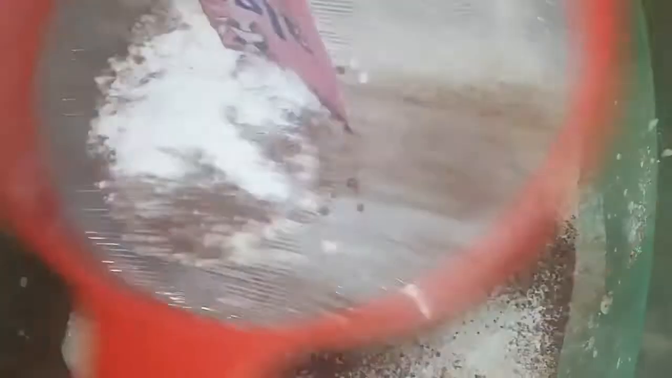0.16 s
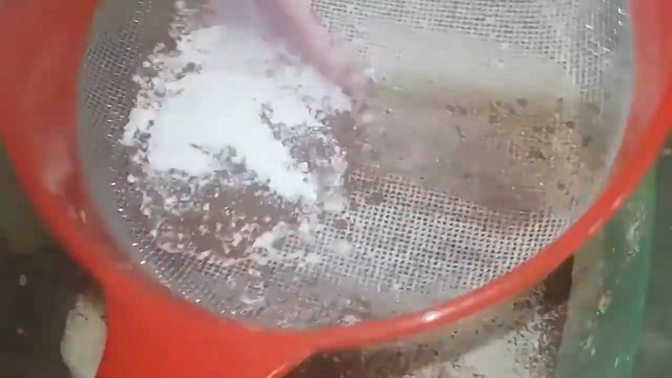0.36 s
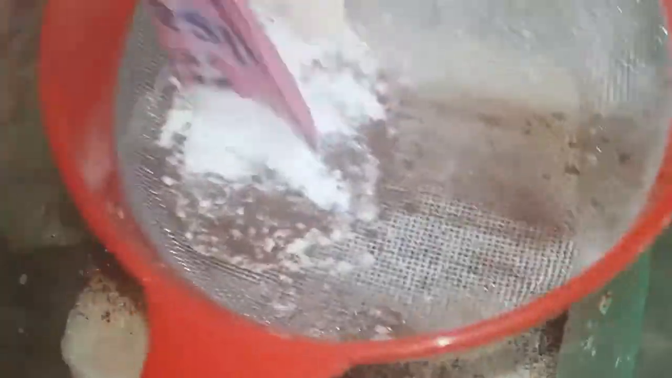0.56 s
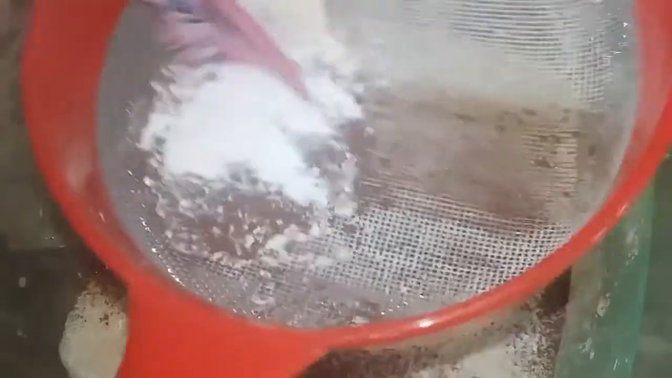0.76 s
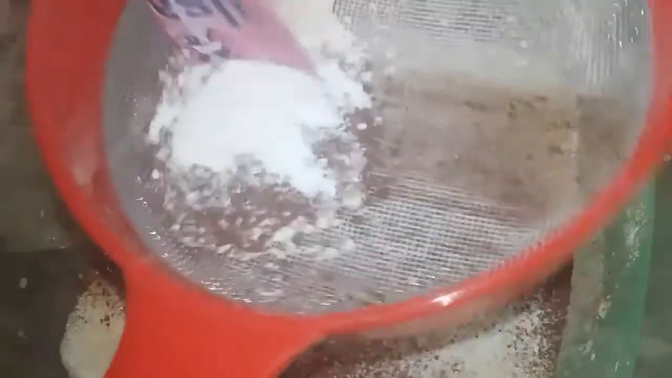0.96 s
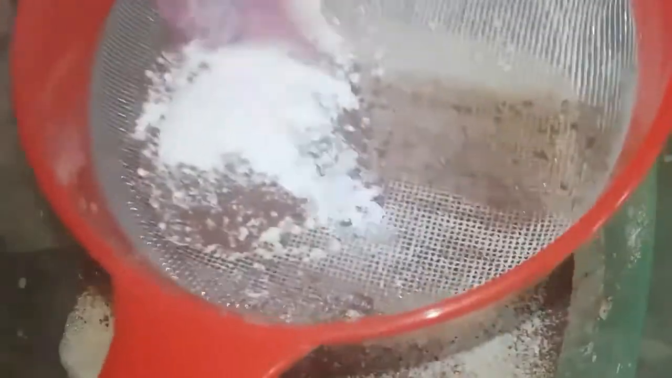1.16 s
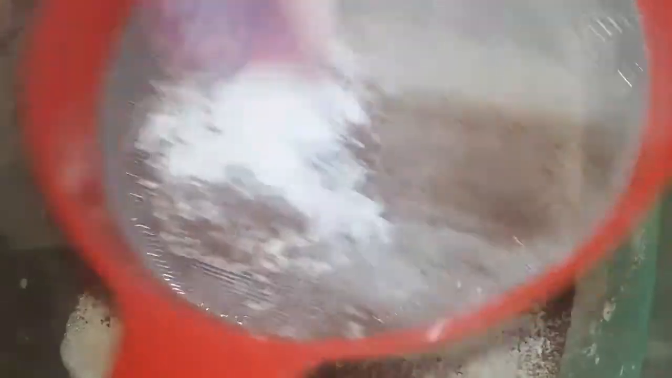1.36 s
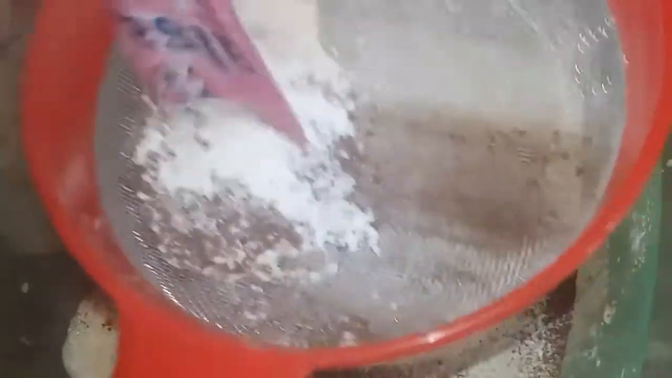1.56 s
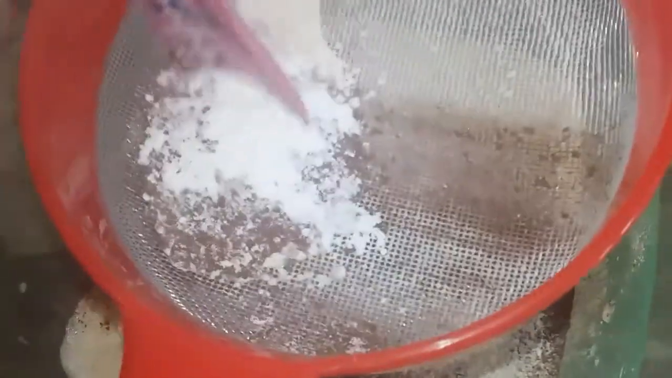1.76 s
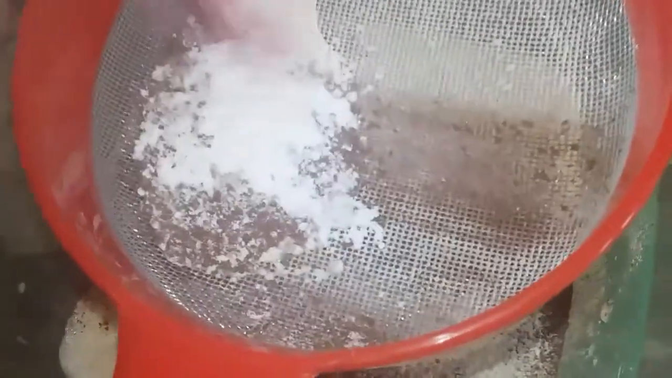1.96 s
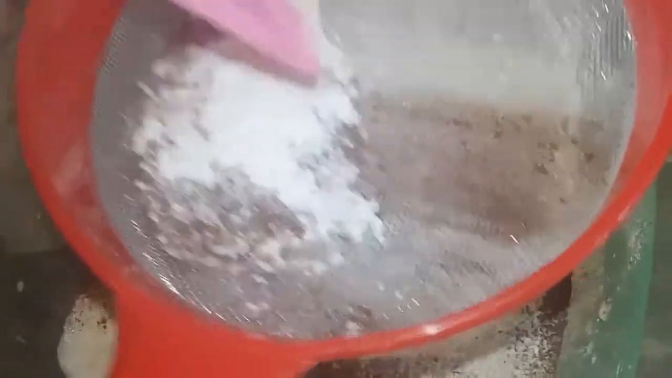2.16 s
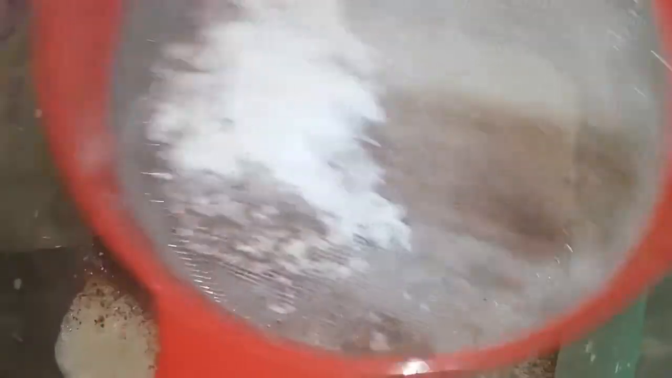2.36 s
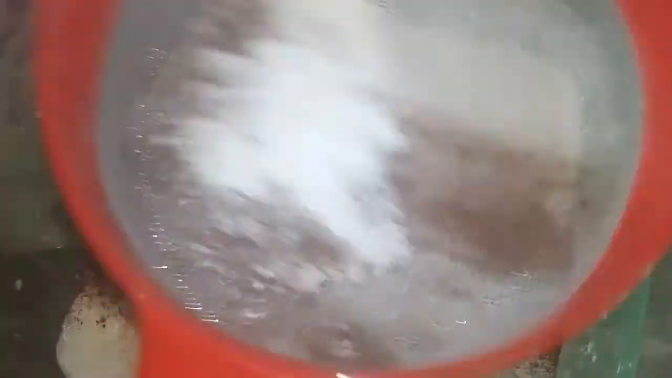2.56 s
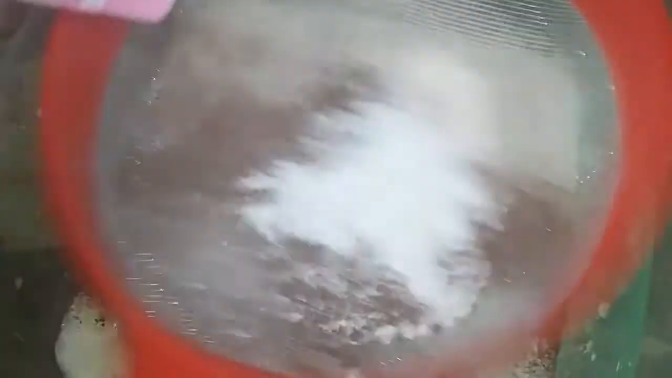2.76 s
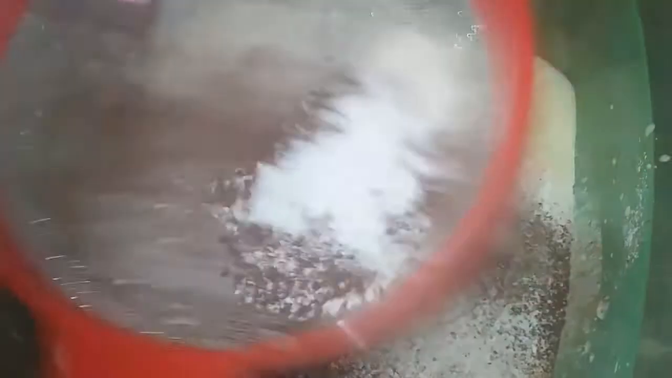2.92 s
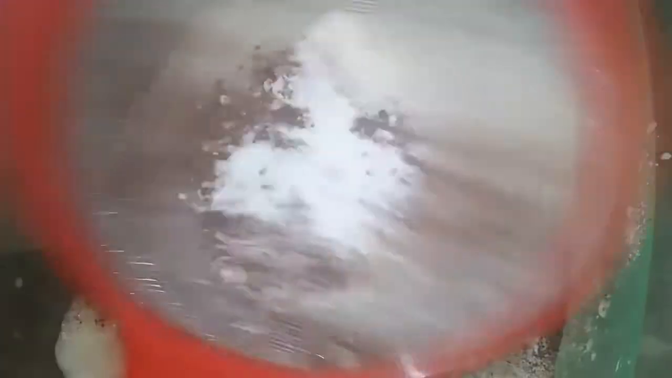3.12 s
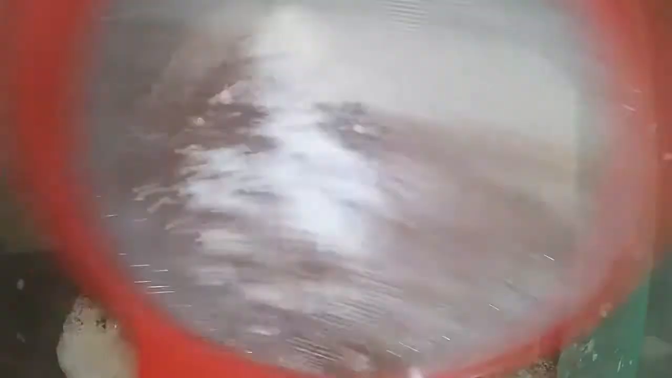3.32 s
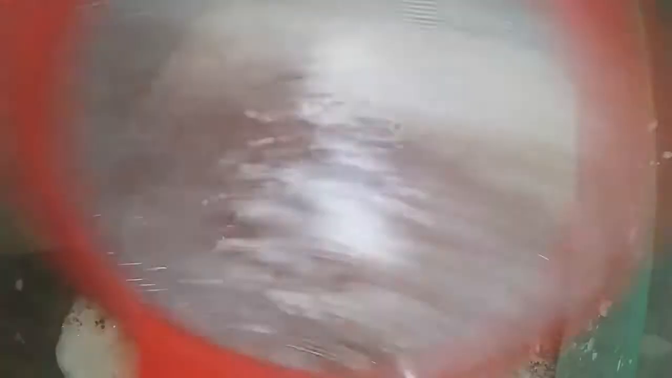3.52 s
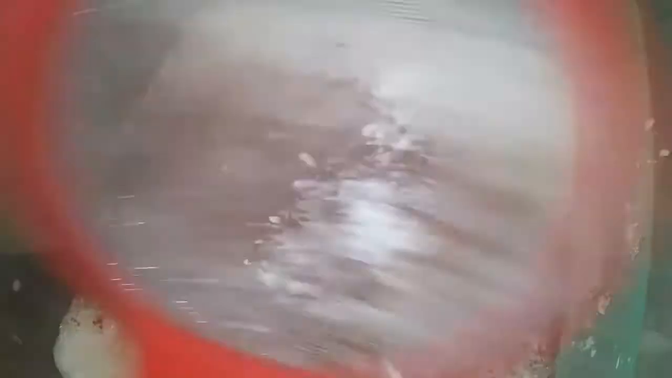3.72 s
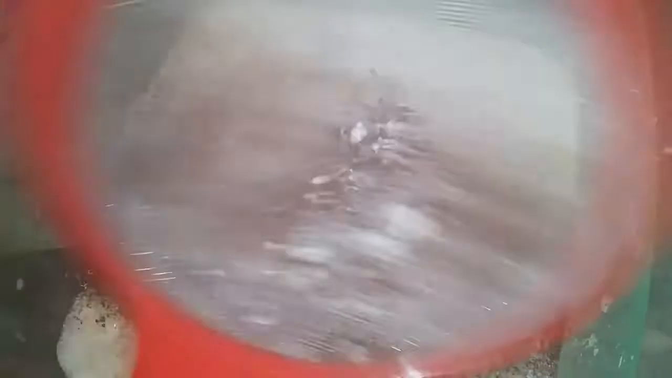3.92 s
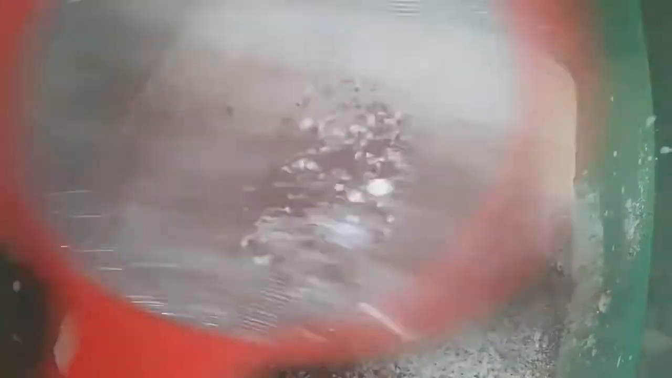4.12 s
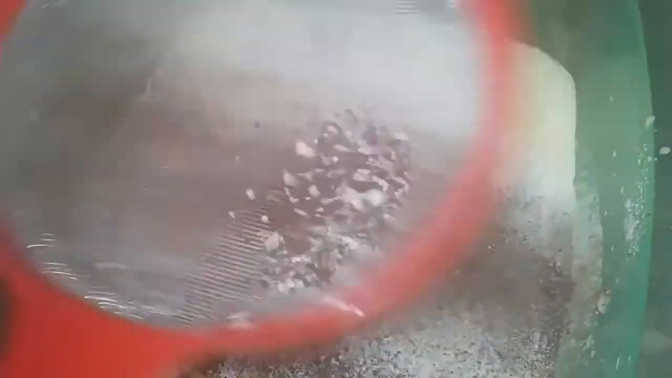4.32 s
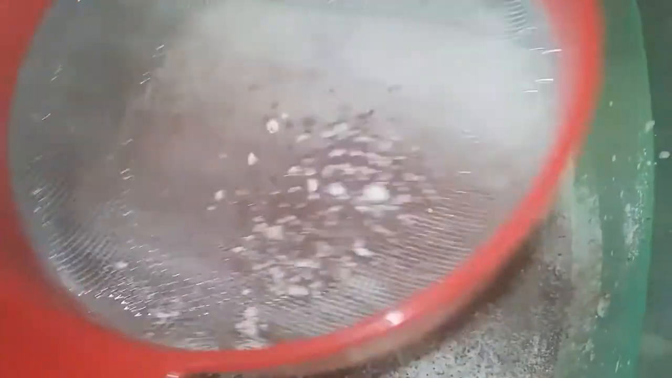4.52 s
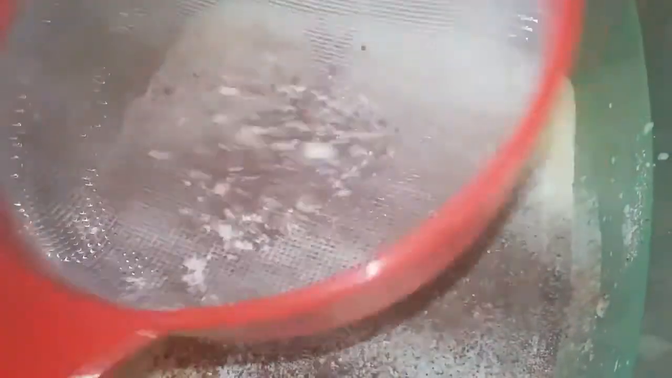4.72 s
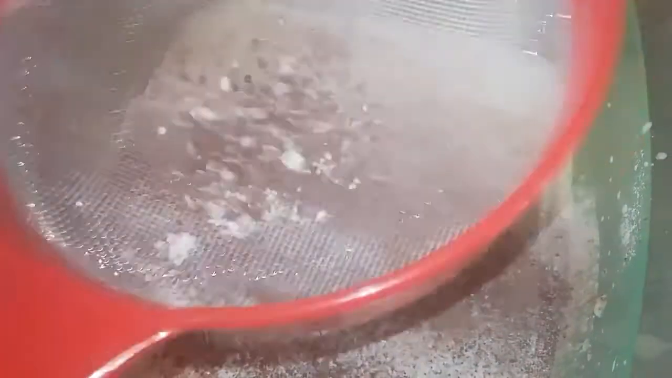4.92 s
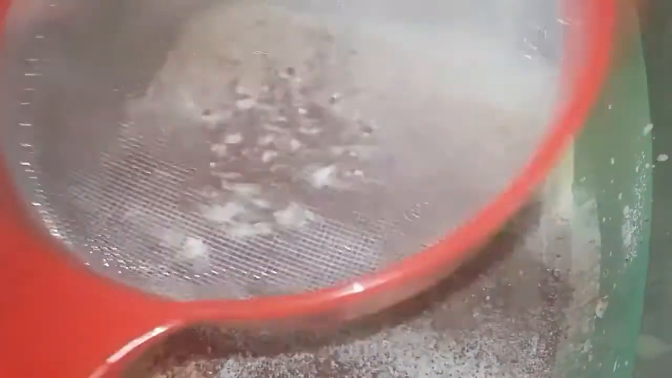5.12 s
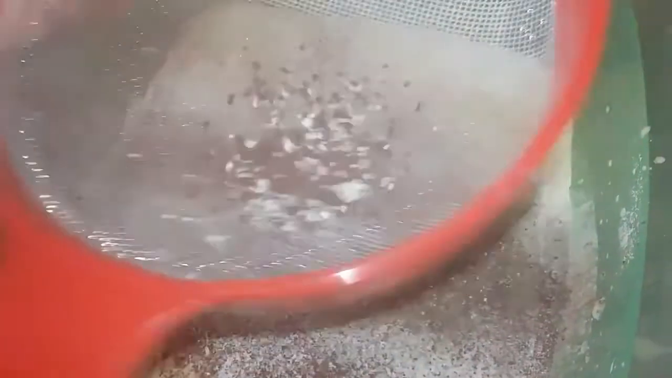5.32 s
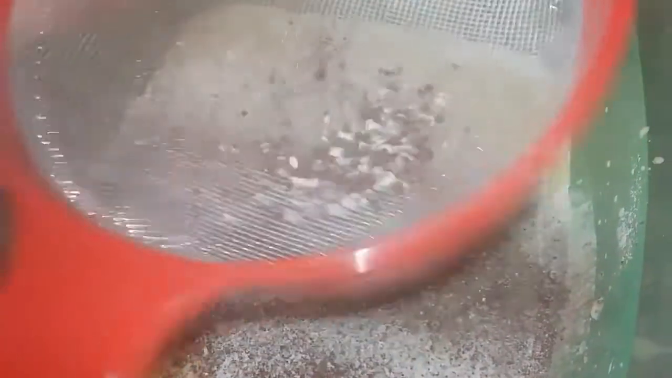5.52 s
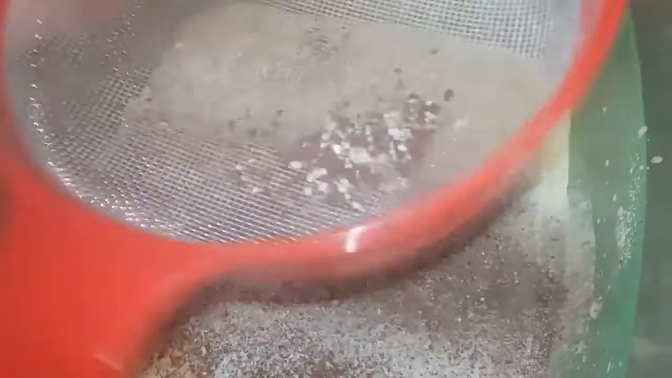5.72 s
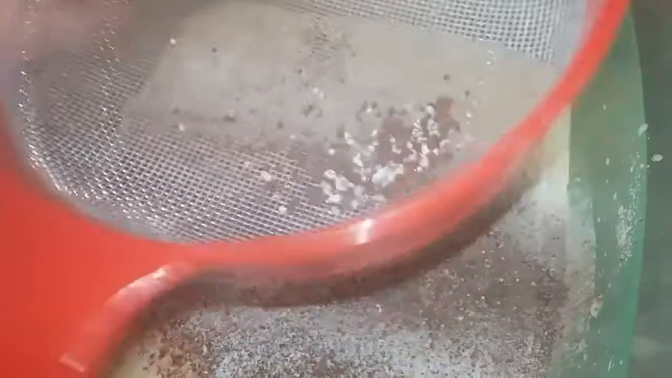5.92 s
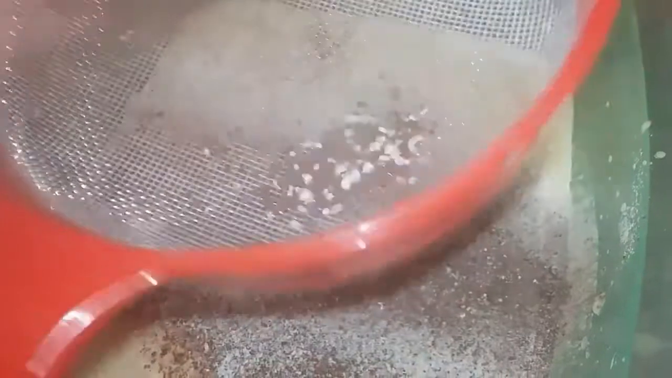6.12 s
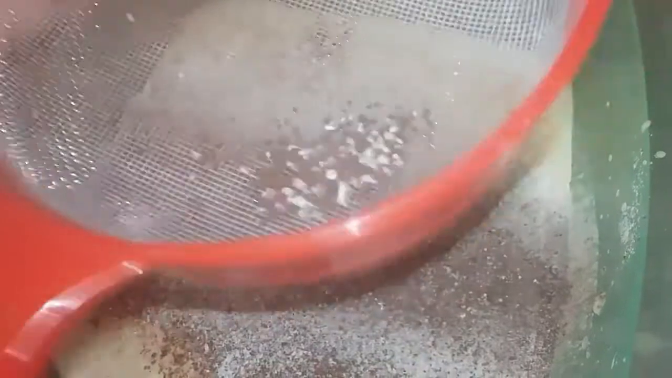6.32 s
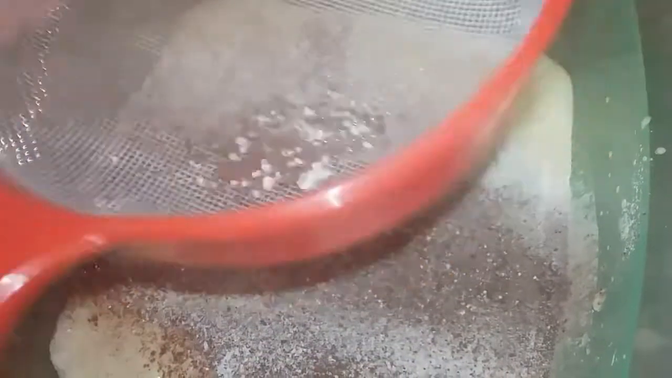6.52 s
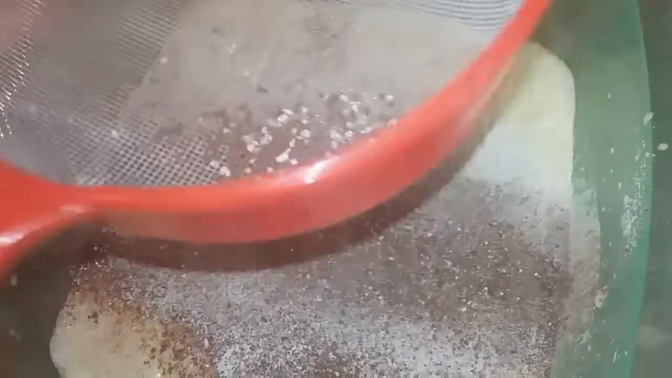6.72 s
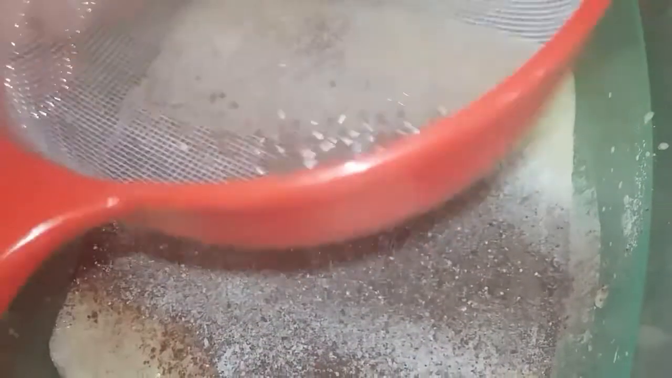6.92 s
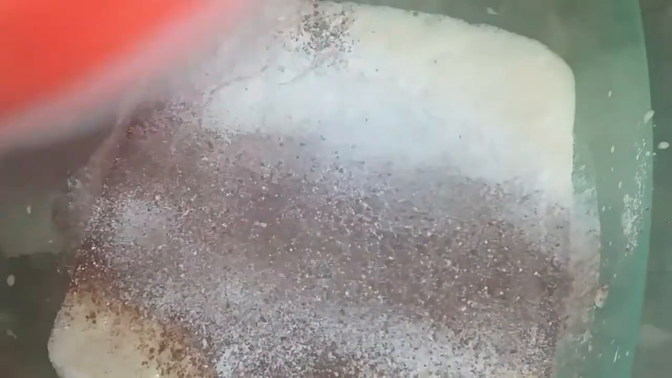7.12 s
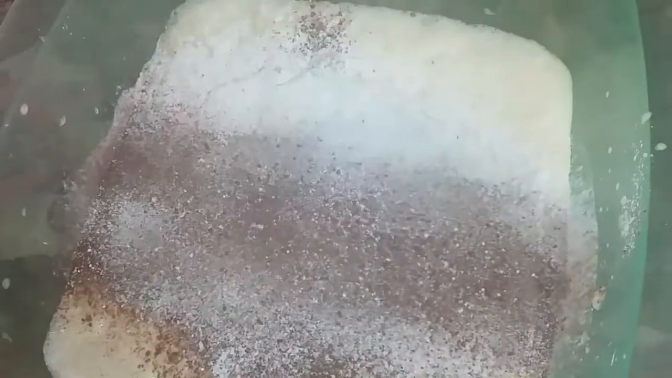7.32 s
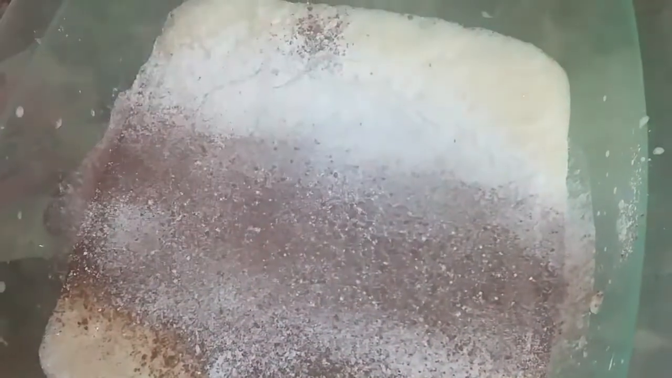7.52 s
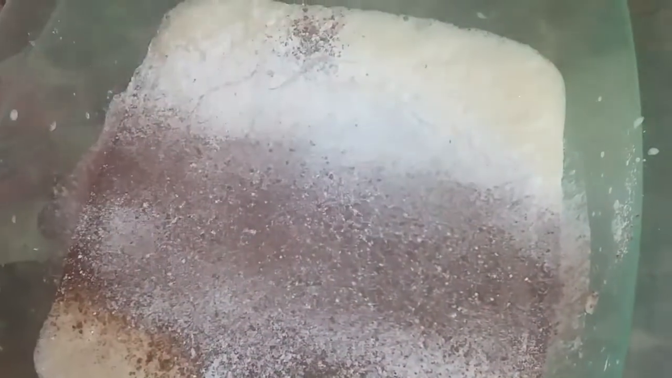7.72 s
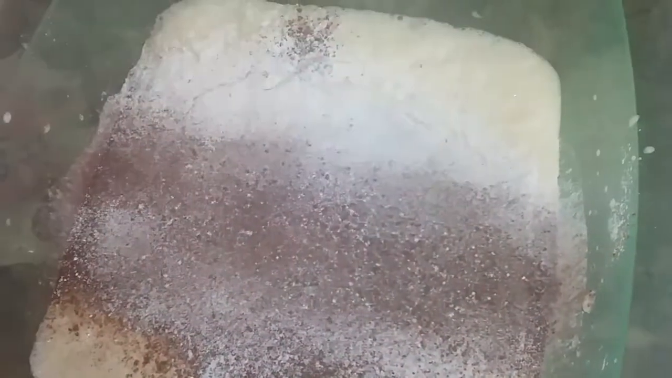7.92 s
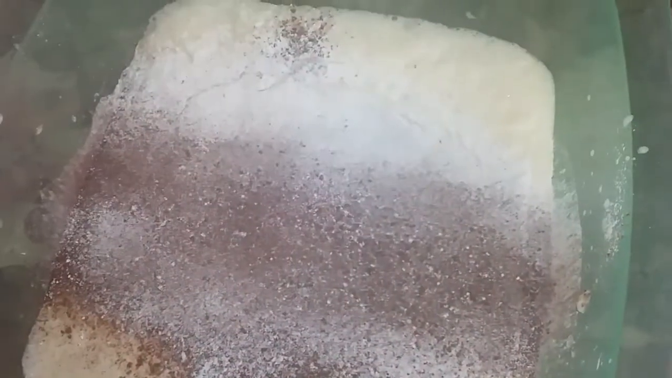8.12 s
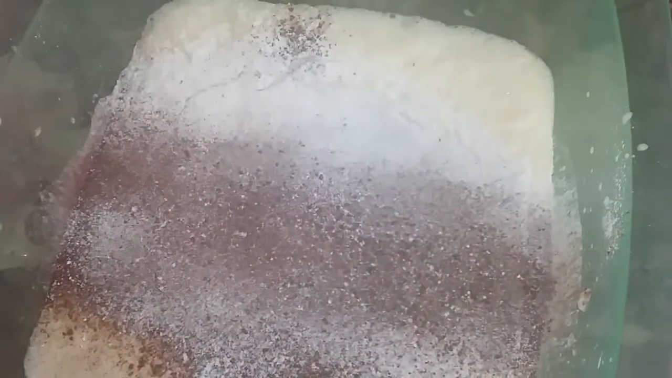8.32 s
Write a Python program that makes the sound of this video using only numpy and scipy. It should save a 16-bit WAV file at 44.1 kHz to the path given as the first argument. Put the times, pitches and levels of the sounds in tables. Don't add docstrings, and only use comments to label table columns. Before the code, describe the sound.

A plastic sieve is tapped in sharp clattering clusters, powder hissing on its mesh, then knocked by hand in a steady run before near silence.

```python
import sys
import numpy as np
from scipy import signal
from scipy.fft import rfft, irfft
from scipy.io import wavfile
from scipy.ndimage import uniform_filter1d

SR = 44100
rng = np.random.default_rng(int(sys.argv[2]) if len(sys.argv) > 2 else 0)


def linear_from_db(decibels):
    return 10 ** (np.asarray(decibels, float) / 20)


def wav_out(sig):
    wavfile.write(sys.argv[1], SR, np.round(np.clip(np.atleast_2d(sig).T, -1, 1) * 32767).astype(np.int16))


N = 373527
TIME = np.arange(N) / SR

# [f/Hz, level/dB]
AIR_COLOUR = [(45, -20), (70, -12.5), (104, -1.5), (171, -7.5), (246, -8.5), (307, -15), (405, -11),
              (551, -20), (1730, -19.5), (2160, -23.5), (3770, -31.5), (7000, -43.5), (15600, -45.5),
              (15900, -67)]
# [t/s, level/dB]
HUM_LEVEL = [(0.0, -63), (0.47, -62), (0.6, -53), (0.97, -52), (1.2, -59.5), (1.4, -54.5), (1.99, -46.5),
             (2.39, -47), (2.51, -50.5), (2.94, -58.5), (3.41, -59), (3.73, -65), (4.0, -79), (4.48, -54),
             (4.62, -76), (5.0, -73)]
# [f/Hz, width/Hz, level/dB]
MOTOR_WHIRR = [(138.3, 14, -69), (244, 12, -68.5), (413.5, 10, -67), (479, 10.1, -76)]
# [f/Hz, time to fall 60 dB/s]
ROOM_DECAY = [(200, 0.44), (1000, 0.17), (4000, 0.11), (12000, 0.074)]
# [t/s, f/Hz, level/dB]
TRAY_CREAK = [
    (7.78, 413.5, -71),
    (7.884, 411, -64.5),
    (7.956, 387.5, -52.5),
    (8.1, 388.9, -71),
]
# [t/s, peak level/dB, f/Hz, time to fall 60 dB/s]
TRAY_BUMPS = [(1.8, -46, 292, 0.055), (2.31, -37, 397, 0.068), (4.162, -37, 224, 0.05),
              (4.239, -27.5, 358, 0.056), (4.431, -18, 352, 0.093), (4.454, -13, 498, 0.031),
              (4.473, -20.5, 364, 0.09), (4.494, -33, 204, 0.026), (4.511, -28.5, 140, 0.027),
              (4.539, -33.5, 99, 0.4), (4.58, -40.5, 239.5, 0.12)]
# [t/s, peak level/dB, f/Hz]
HANDLE_THUDS = [(0.566, -33.5, 103), (0.83, -39, 97), (1.54, -33, 111), (2.044, -31, 98), (2.488, -37, 105),
                (2.784, -40, 101), (4.828, -31.5, 122), (5.046, -33.5, 136), (5.227, -31, 95),
                (5.419, -32.5, 91), (5.596, -28.5, 105), (5.803, -27, 107), (6, -30.5, 113),
                (6.191, -28.5, 105), (6.373, -33, 109), (6.586, -23, 96), (6.79, -31.5, 130),
                (7.994, -43, 81)]
# [f/Hz, level/dB]
POWDER_COLOUR = [(300, -1.5), (900, -4), (1500, -6.5), (2100, 2.5), (2800, -13.5), (3600, -18.5),
                 (4550, -23.5), (5250, -15), (5900, -24.5), (7000, -30.5), (9300, -35.5), (13500, -41.5),
                 (15500, -39), (15900, -80)]
# [f/Hz, level/dB]
LUMP_COLOUR = [(2600, 2), (3300, 1), (4500, 8), (5250, -2.5), (6500, 0)]
# [t/s, hiss level/dB, lumps level/dB]
TRICKLE_LEVEL = [
    (0, -71.5, -66),
    (1.4, -67, -57.5),
    (2.9, -68, -57.5),
    (3.9, -67.5, -58.5),
    (4.05, -66.5, -60),
    (4.9, -72, -62),
    (6.9, -66.5, -64),
    (7.1, -76, -64),
    (7.8, -77, -60),
    (8.47, -80, -63),
]
# [middle t/s, hiss level/dB, lumps level/dB, half length/s]
STIRRED_POWDER = [(0.01, -56.5, -56.5, 0.3), (0.21, -59.5, -68, 0.044), (0.585, -47, -56, 0.05),
                  (0.72, -57, -53, 0.34), (1.151, -51.5, -55, 0.11), (1.345, -54.5, -53, 0.098),
                  (1.676, -56.5, -60, 0.065), (1.96, -52, -50.5, 0.057), (2.155, -50, -47.5, 0.066),
                  (2.4, -62, -44, 0.26), (2.528, -49, -49, 0.089), (3.17, -64.5, -61, 0.33),
                  (3.95, -63.5, -61, 0.051), (4.17, -62, -56.5, .12), (8.0, -66.5, -62, 0.29),
                  (8.45, -64.5, -55.5, 0.16)]
# [t/s, hiss level/dB, lumps heard in the rim level/dB, settling time/s]
THROWN_POWDER = [(0.09, -68, -58, 0.2), (0.4, -66, -60, 0.13), (0.52, -42.5, -39.5, 0.17),
                 (0.813, -39, -41, 0.22), (1.074, -50, -47.5, 0.12), (1.544, -46.5, -45, 0.067),
                 (1.809, -44, -39, 0.35), (2.048, -50, -43, 0.27), (2.316, -46.5, -51, 0.24),
                 (2.478, -37.5, -46, 0.1), (2.715, -43.5, -44.5, 0.041), (2.787, -48, -37, 0.033),
                 (4.224, -51.5, -39, 0.15), (4.444, -51.5, -40.5, 0.33), (4.844, -55.5, -55, 0.081),
                 (5.054, -47, -48, 0.21), (5.236, -51.5, -45, 0.14), (5.42, -47.5, -45, 0.084),
                 (5.604, -51.5, -45.5, 0.11), (5.804, -52.5, -46.5, 0.11), (6.003, -53, -41.5, 0.023),
                 (6.199, -53, -45, 0.092), (6.383, -53, -51, .07), (6.593, -53, -47, .09),
                 (6.797, -51, -43, 0.034), (6.97, -61, -58, .04), (7.833, -57, -51, 0.11),
                 (8.3, -64, -50.5, 0.036)]
# [f/Hz, level/dB]
RIM_RING = [(150, -21), (300, -16), (900, -11.5), (1500, -2), (1900, 8), (2150, 11), (2500, -5.5),
            (2900, -14.5), (4000, -23), (16500, -82)]
# [f/Hz, level/dB]
MESH_RING = [(1200, -34.5), (2500, -13.5), (3500, -7), (4200, -9), (4700, -16), (5250, -6), (5900, -17.5),
             (6800, -24), (7600, -26.5), (8600, -29), (11600, -34.5), (13700, -33.5), (15300, -36),
             (16500, -60)]
# [start t/s, gap/s, peak level/dB]
MESH_SLIPS = [
    (2.672, 0.0079, -57),
    (4.72, .016, -63),
    (4.784, .016, -64),
]
# [t/s, peak level/dB]
CRUMB_TICKS = [(0.0111, -39), (0.2014, -46), (0.593, -34.5), (0.9326, -41), (1.1474, -40.5), (1.3348, -43),
               (1.345, -38), (2.4966, -45), (2.538, -44), (2.691, -41), (2.7194, -37), (3.1101, -48),
               (3.219, -48), (3.682, -52), (4.1422, -42.5), (4.1746, -39), (6.385, -35), (6.9143, -56),
               (6.9665, -45), (7.0431, -59), (7.3553, -50), (7.3735, -46), (7.6226, -55.5), (7.8334, -58),
               (8.0342, -53), (8.069, -54), (8.3055, -47), (8.3424, -52)]
# [t/s, peak level/dB]
REBOUND_HITS = [(0.0901, -30.5), (0.524, -29), (0.539, -24), (0.5982, -31.5), (0.8262, -23),
                (0.8627, -27.5), (1.069, -33), (1.078, -37), (1.105, -34), (1.8114, -26), (1.8281, -24),
                (1.8618, -30.5), (1.918, -26.5), (2.333, -12), (2.363, -28), (2.3699, -29), (2.3978, -27),
                (2.4047, -31), (4.191, -29), (4.208, -25), (4.216, -26), (4.233, -27), (4.246, -33),
                (4.467, -37), (5.6041, -43), (5.8042, -40), (6.966, -41.5)]
# [t/s, rim peak level/dB, mesh level over the rim/dB, chatter/ms]
HAND_KNOCKS = [(4.2212, -16, -3.5, 0.8), (4.2244, -25, 0, 0.34), (4.4318, -27.5, -2, 0.94),
               (4.4414, -25, -7.5, 0.55), (4.835, -25.5, 8, 1.2), (4.8412, -38, 14, 0.26),
               (5.0445, -19, 13, 0.64), (5.2243, -20.5, 3.5, 3.5), (5.2265, -19, 6, 1.2),
               (5.4123, -18, 4.5, 1.34), (5.591, -29, -9, 1.3), (5.5927, -22, 13, 0.67),
               (5.7972, -18, 6, 0.43), (5.9989, -24.5, 5, 0.4), (6.191, -20, 6, 1.8),
               (6.377, -22, 3.5, 2.3), (6.584, -14.5, -4, 1.1), (6.789, -23, 3, 0.35)]
# [t/s, rim peak level/dB, mesh level over the rim/dB, chatter/ms]
SPATULA_TAPS = [(0.0827, -20.5, 2, 1.8), (0.3973, -25, -5.5, 0.97), (0.508, -22, -7, 0.88),
                (0.5146, -15, 0, 1), (0.8033, -19, -8, 0.8), (0.8098, -21, -3, 3.7), (0.8151, -27, 1, 1.7),
                (1.0653, -27, 0.5, 0.24), (1.5325, -21, -9, 2.4), (1.548, -23, -1.5, 0.62),
                (1.7979, -8.5, -7, 2.7), (1.8011, -5.5, -7, 0.42), (1.805, -8, -6, 0.74),
                (2.0388, -12.5, -4.5, 0.9), (2.0461, -11.5, -7, 0.56), (2.062, -20, 3, 1.3),
                (2.0663, -9, -1.5, 0.64), (2.3103, -5.5, -5, 0.35), (2.3186, -24.5, 3, 0.94),
                (2.3292, -21, -4, 0.79), (2.3355, -15, -11, 0.68), (2.4745, -33.5, 8, 2),
                (2.715, -28, 3, 0.56), (2.7794, -25, -2, 0.73), (2.7917, -23, 2.5, 1.6)]

SIFTED_S = 4.8


def evened(x):
    return x / np.sqrt(np.mean(x ** 2) + 1e-20)


def read(points, hz):
    f, value = np.transpose(points)
    return np.interp(np.log(hz + 1), np.log(f + 1), value)


def add(mix, s, sound):
    part = mix[max(round(s * SR), 0):][:len(sound)]
    part += sound[:len(part)]


def coloured(x, points):
    gain = linear_from_db(read(points, np.fft.rfftfreq(len(x), 1 / SR)))
    return irfft(rfft(x) * gain, len(x))


def narrow(hz, width):
    r = np.exp(-np.pi * width / SR)
    z = rng.standard_normal(N) + 1j * rng.standard_normal(N)
    for _ in range(2):
        z = signal.lfilter([1], [1, -r], z)
    return evened((z * np.exp(2j * np.pi * hz * TIME)).real)


def causal(points):
    log_gain = np.log(linear_from_db(read(points, abs(np.fft.fftfreq(4096, 1 / SR)))))
    return np.fft.ifft(np.exp(np.conj(signal.hilbert(log_gain)))).real[:1024]


def kitchen_air():
    swell = evened(uniform_filter1d(uniform_filter1d(rng.standard_normal(N), 3000), 3000))
    air = linear_from_db(-57.5 + 0.47 * swell) * evened(coloured(rng.standard_normal(N), AIR_COLOUR))
    drone = np.sqrt(2) * np.sin(2 * np.pi * 100.0 * TIME) + 0.54 * narrow(hz=102.5, width=13.5)
    hum = linear_from_db(np.interp(TIME, *np.transpose(HUM_LEVEL), right=-80)) * drone
    whirr = np.zeros(N)
    for hz, width, db in MOTOR_WHIRR:
        whirr += linear_from_db(db) * (narrow(hz, width) + 1.57 * np.sin(2 * np.pi * hz * TIME))
    return air + whirr + hum


def room(x):
    hz, t, z = signal.stft(rng.standard_normal(SR // 2), SR, nperseg=128)
    decay = linear_from_db(-60 * t / read(ROOM_DECAY, hz)[:, None])
    tail = signal.istft(z * decay, SR, nperseg=128)[1]
    tail = tail * np.clip(np.arange(len(tail)) / 150 - .3, 0, 1)
    return signal.fftconvolve(x, tail / np.linalg.norm(tail))[:N]


def tray_creak():
    s, hz, db = np.transpose(TRAY_CREAK)
    level = uniform_filter1d(linear_from_db(np.interp(TIME, s, db, left=-120, right=-120)), 600)
    turns = np.cumsum(np.interp(TIME, s, hz)) / SR
    return np.sqrt(2) * level * np.sin(2 * np.pi * turns)


def thud(db, hz, t60, puff_share):
    t = np.arange(8000) / SR
    band = signal.butter(3, [170, 600], "band", fs=SR, output="sos")
    puff = evened(signal.sosfilt(band, rng.standard_normal(len(t))))
    body = np.sin(2 * np.pi * hz * t)
    body += 0.21 * np.sin(2 * np.pi * hz * 1.31 * t)
    body += 0.38 * np.sin(2 * np.pi * hz * 0.63 * t)
    fade = linear_from_db(-60 * t / max(t60, .01))
    soft_start = 1 - np.exp(-t / 0.00046)
    wave = (body + puff_share * puff) * fade * soft_start
    return linear_from_db(db) * wave / abs(wave).max()


def tray_bumps():
    out = np.zeros(N)
    for s, db, hz, t60 in TRAY_BUMPS:
        add(out, s, thud(db, hz, t60, puff_share=0.73))
    return out


def handle_thuds():
    out = np.zeros(N)
    for s, db, hz in HANDLE_THUDS:
        add(out, s, thud(db, hz, t60=0.074, puff_share=0.49))
    return out


def sliding():
    t = TIME[::64]
    s, hiss_db, lump_db = np.transpose(TRICKLE_LEVEL)
    power = linear_from_db(2 * np.array([np.interp(t, s, hiss_db), np.interp(t, s, lump_db)]))
    for rows, thrown in ((THROWN_POWDER, True), (STIRRED_POWDER, False)):
        for s, hiss_db, lump_db, length in rows:
            u = np.minimum(abs(t - s) / length, 4)
            fall = 21 * u ** 1.6
            if thrown:
                early = np.minimum(1800 * (s - t), 249 * (s - t) + 8)
                sag_db, stop_db, curve = (10, 19.5, 1.77) if s < SIFTED_S else (9.5, 9.5, 4.0)
                fall = np.where(t < s, early, sag_db * np.sqrt(u) + stop_db * u ** curve)
            power += linear_from_db(2 * np.array([hiss_db - fall, lump_db - fall]))
    return [np.interp(TIME, t, np.sqrt(p)) for p in power]


def powder():
    size = linear_from_db(2.8 * np.minimum(rng.exponential(1, N), 4))
    size = size * (rng.random(N) < 5000 / SR)
    clumps = evened(uniform_filter1d(uniform_filter1d(rng.standard_normal(N), 200), 200))
    grains = evened(size * rng.standard_normal(N)) + 0.91 * rng.standard_normal(N)
    hz, t, z = signal.stft(grains * linear_from_db(2.0 * clumps), SR, nperseg=256, noverlap=192)
    patches = uniform_filter1d(rng.standard_normal(z.shape[::-1]).T, size=5, axis=0)
    patches = evened(uniform_filter1d(patches, size=16, axis=1))
    z = z * linear_from_db(1.56 * patches + read(LUMP_COLOUR, hz)[:, None] * (t > SIFTED_S))
    grains = coloured(signal.istft(z, SR, nperseg=256, noverlap=192)[1][:N], POWDER_COLOUR)
    low = signal.sosfiltfilt(signal.butter(4, 2900, fs=SR, output="sos"), grains)
    hiss, lumps = sliding()
    return lumps * evened(low) + hiss * evened(grains - low)


def ring_sieve(rows):
    out, t = np.zeros(N), np.arange(-220, 660) / SR
    rim, mesh = causal(RIM_RING), causal(MESH_RING)
    for s, db, mesh_db, ms in rows:
        long = np.clip(ms, .1, 3) * .0008
        chatter = np.exp(-(t / np.where(t < 0, 0.51 * long, 1.64 * long)) ** 2)
        graze = 0.17 * np.clip(mesh_db / 20 + 2.8, 0, 1) * (t > -.0036) * (t < 0)
        rattle = 0.55 * (t > 0) * np.exp(-abs(t) / 0.0034)
        push = rng.standard_normal(len(t)) * (chatter + graze + rattle)
        low, high = np.convolve(push, rim), np.convolve(push, mesh)
        ring = low / abs(low).max() + linear_from_db(mesh_db) * high / abs(high).max()
        add(out, s + t[0], linear_from_db(db) * ring)
    return out


def mesh_slips():
    return ring_sieve([(s + k * gap, db, 12, .2) for s, gap, db in MESH_SLIPS for k in range(3)])


def crumb_ticks():
    return ring_sieve([(s, db, 3.5, 0.75) for s, db in CRUMB_TICKS])


def rebounds():
    return ring_sieve([(s, db, -9, 0.93) for s, db in REBOUND_HITS])


def hand_knocks():
    return ring_sieve(HAND_KNOCKS)


def spatula_taps():
    return ring_sieve(SPATULA_TAPS)


def scene():
    hits = spatula_taps() + hand_knocks() + rebounds() + crumb_ticks() + mesh_slips()
    hits += handle_thuds() + tray_bumps()
    hits = signal.sosfilt(signal.butter(3, 62, "high", fs=SR, output="sos"), hits)
    sift = signal.sosfilt(signal.butter(3, 110, "high", fs=SR, output="sos"), powder())
    mix = hits + linear_from_db(-18.0) * room(hits) + sift + tray_creak() + kitchen_air()
    return mix[None]


def band_limit(x):
    return signal.sosfilt(signal.butter(12, 16790, fs=SR, output="sos"), x)


def record(dry):
    edge = signal.firwin(255, 16400, window=("kaiser", 8), fs=SR)
    mix = signal.oaconvolve(dry, edge[None], "same") - .0005
    return band_limit(mix)


dry = scene()
out = record(dry)
wav_out(out)
```